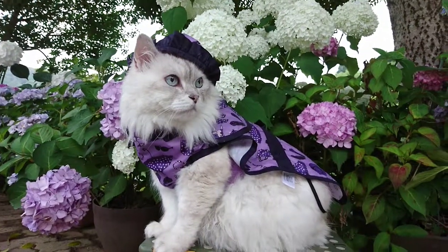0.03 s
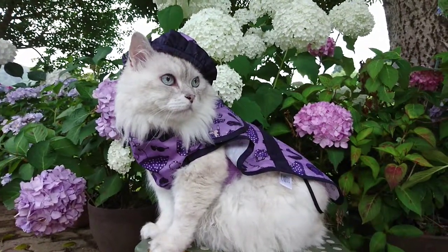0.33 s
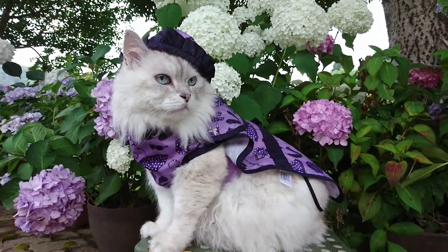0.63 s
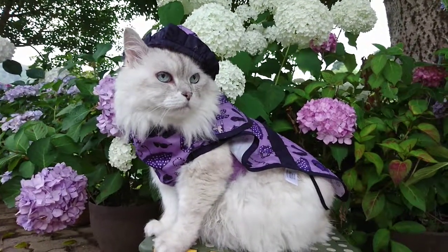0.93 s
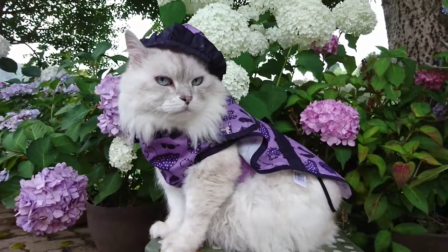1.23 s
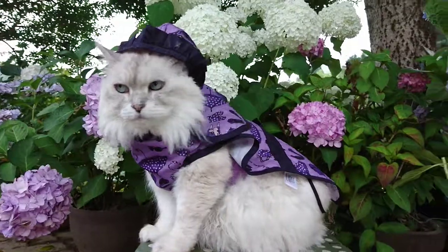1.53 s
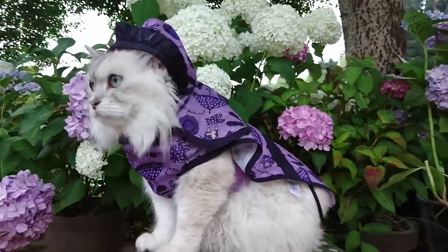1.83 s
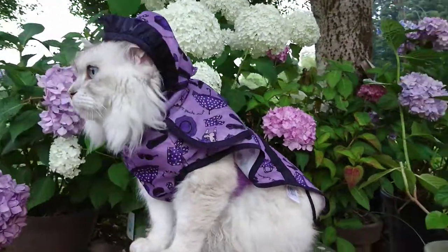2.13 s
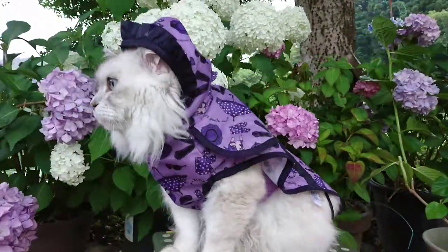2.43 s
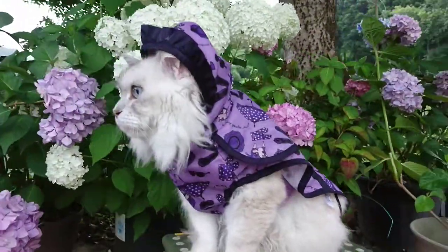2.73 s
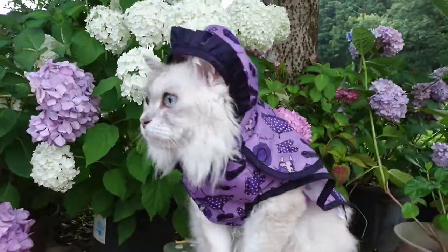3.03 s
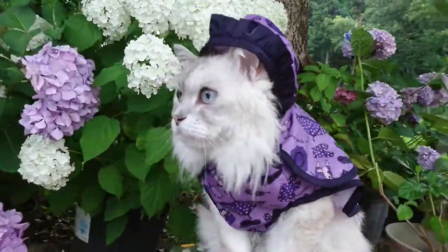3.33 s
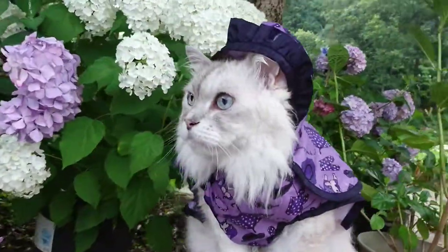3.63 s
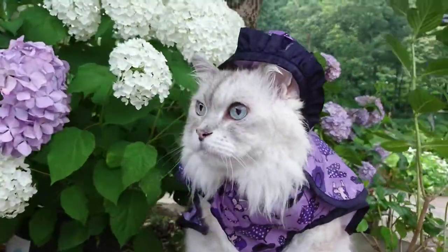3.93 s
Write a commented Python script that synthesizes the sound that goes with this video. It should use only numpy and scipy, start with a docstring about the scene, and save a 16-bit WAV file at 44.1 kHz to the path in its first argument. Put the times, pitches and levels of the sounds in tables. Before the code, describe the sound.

A brief whistled bird call outdoors, followed by soft rain and scattered water drips.

```python
"""Bush warbler in light rain

A bush warbler ends its song with three quick whistled notes that scatter among wet garden trees.
Fine rain hisses on the foliage and drips tick on leaves; one drop plops close by and one hits the
right microphone. Under it lie faint far chirps, a low outdoor rumble and a far drone, probably
traffic, that swells and fades."""
import sys
import numpy as np
from scipy import signal
from scipy.fft import rfft, irfft
from scipy.io import wavfile
from scipy.ndimage import uniform_filter1d

SR = 44100
rng = np.random.default_rng(int(sys.argv[2]) if len(sys.argv) > 2 else 0)


def materialize(psi):
    """Save the field psi as 16-bit PCM at rate SR to the path in sys.argv[1].

    A 1-D psi becomes a single channel; in a 2-D psi each row is a channel.
    """
    bounded = np.clip(np.atleast_2d(psi).T, -1, 1)
    quanta = np.round(bounded * 32767).astype(np.int16)
    wavfile.write(sys.argv[1], SR, quanta)


N = 176400
T = np.arange(N) / SR
BIN_HZ = np.maximum(np.arange(N // 2 + 1) * SR / N, 1)


def from_db(db):
    """Decibels to gain."""
    return 10 ** (np.asarray(db) / 20)


def unit_rms(x):
    """Scale to rms one."""
    return x / np.sqrt(np.mean(x ** 2) + 1e-20)


def pan(db):
    """Stereo gains, mean one; db is left minus right."""
    gains = from_db(np.array([[db], [-db]]) / 2)
    return gains / gains.mean()


def envelope(points):
    """Gain curve through (time_s, level_db) points."""
    return from_db(np.interp(T, *np.transpose(points)))


def low_cut(x, hz):
    """Second-order high-pass."""
    return signal.sosfilt(signal.butter(2, hz, "high", fs=SR, output="sos"), x)


def drift(rate_hz, size):
    """Smooth random wander, rms one."""
    hz = np.arange(size // 2 + 1) * SR / size
    return unit_rms(irfft(rfft(rng.standard_normal(size)) / (1 + (hz / rate_hz) ** 2), size))


def click(start_s):
    """Unit impulse."""
    return 1. * (np.arange(N) == int(start_s * SR))


def ring(x, hz, t60_s):
    """Resonator: a unit click starts a decaying sine of height one."""
    radius, angle = from_db(-60 / (t60_s * SR)), 2 * np.pi * hz / SR
    return signal.lfilter([0, np.sin(angle)], [1, -2 * radius * np.cos(angle), radius ** 2], x + 1e-18)


def radiate(x, hz, t60_s):
    """Mode of a small object, which gives off no bass."""
    return np.diff(ring(x, hz, t60_s), prepend=0) / (2 * np.sin(np.pi * hz / SR))


def colour(hz, db):
    """Gain per FFT bin, falling 12 dB per octave above the last point."""
    return from_db(np.interp(np.log(BIN_HZ), np.log(hz), db)) * np.minimum(hz[-1] / BIN_HZ, 1) ** 2


def band_noise(spectrum, correlation):
    """Coloured stereo noise with a given left-right correlation, rms one."""
    hz, db = np.transpose(spectrum)
    gain = colour(hz, db) * np.minimum(BIN_HZ / hz[0], 1) ** 2
    mid, side = irfft(rfft(rng.standard_normal((2, N))) * gain, N)
    return unit_rms(np.sqrt(1 + correlation) * mid + np.sqrt(1 - correlation) * side * [[1], [-1]])


def hiss(spectrum):
    """Independent noise on each side, each with its own colour."""
    hz, *sides_db = np.transpose(spectrum)
    return irfft(rfft(rng.standard_normal((2, N))) * [colour(hz, db) for db in sides_db], N)


def scatter(t60_s, build_s=.014):
    """Stereo response of countless small reflections that build and decay, unit energy."""
    t = T[:SR]
    response = rng.standard_normal((2, SR)) * from_db(-60 * t / t60_s) * (1 - np.exp(-t / build_s))
    return unit_rms(response) / np.sqrt(SR)


def whistle(note, t, edge_s=.004, waver=.004, overtone_db=-35):
    """Nearly pure tone gliding through (time_s, pitch_hz, level_db) points."""
    time_s, pitch_hz, level_db = np.transpose(note)
    glide_hz = uniform_filter1d(np.interp(t, time_s, pitch_hz), size=128)
    wavering_hz = glide_hz * (1 + waver * drift(rate_hz=165, size=len(t)))
    phase = 2 * np.pi * np.cumsum(wavering_hz) / SR
    tone = np.sqrt(2) * (np.sin(phase) + from_db(overtone_db) * np.sin(2 * phase))
    gate = np.clip(np.minimum(t - time_s[0], time_s[-1] - t) / edge_s + .5, 0, 1)
    return from_db(np.interp(t, time_s, level_db)) * np.sin(gate * np.pi / 2) ** 2 * tone


# Rumble, drone and swell spectra: freq_hz, relative_db
RUMBLE_SPECTRUM = [(20, -44), (35, -20), (55, -3), (115, 0), (170, -7), (250, -14), (500, -17), (900, -50)]
DRONE_SPECTRUM = [(240, -29.5), (305, -10), (350, 0.5), (395, -2.5), (460, -8), (600, -19.5), (900, -53)]
SWELL_SPECTRUM = [(200, -16.5), (270, -11.5), (325, -0.5), (365, -7.5), (430, -20), (600, -35)]
# Rumble and drone envelopes: time_s, level_db
RUMBLE_ENVELOPE = [(0, -73.5), (.45, -72), (.9, -68.5), (1.3, -70.5), (2.0, -71.5), (3.3, -73), (3.85, -67),
                   (4, -69)]
DRONE_ENVELOPE = [(0, -72.5), (.7, -81.5), (1.2, -75.5), (1.7, -80.5), (2.05, -69.5), (2.46, -73),
                  (3.1, -68), (3.65, -76.5), (4, -68.5)]


def rumble_and_drone(swell_db=-64, swell_peak_s=3.08, swell_width_s=.47):
    """Outdoor rumble, a far drone, probably traffic, and a lower drone that swells once."""
    rumble = envelope(RUMBLE_ENVELOPE) * band_noise(RUMBLE_SPECTRUM, correlation=.84)
    drone = envelope(DRONE_ENVELOPE) * band_noise(DRONE_SPECTRUM, correlation=.71)
    swell_gain = from_db(swell_db) * np.exp(-((T - swell_peak_s) / swell_width_s) ** 2)
    swell = swell_gain * band_noise(SWELL_SPECTRUM, correlation=.71)
    return pan(-5) * (rumble + drone + swell)


# Distant chirps: start_s, length_s, start_hz, end_hz, level_db
CHIRPS = [(.98, 0.093, 4315, 4450, -71), (1.103, .08, 4280, 4080, -72), (3.572, .05, 3720, 3880, -67)]


def far_birds():
    """Chirps so far off that only their scatter arrives."""
    chirps = sum(whistle([(start_s, start_hz, db), (start_s + length_s, end_hz, db)], T)
                 for start_s, length_s, start_hz, end_hz, db in CHIRPS)
    return signal.fftconvolve(chirps[None], scatter(t60_s=.45), axes=1)[:, :N]


# Rain spectra before and after the microphone turns: freq_hz, left_db, right_db
RAIN_BEFORE_TURN = [(610, -61.5, -58.5), (900, -60.5, -58), (1330, -59.5, -60), (1900, -53, -55.5),
                    (2430, -51.5, -54.5), (3180, -59.5, -55.5), (4060, -62, -53.9), (5310, -63, -56),
                    (6300, -67.5, -53.4), (7260, -64, -55), (7960, -75, -70), (8500, -94.5, -69)]
RAIN_AFTER_TURN = [(590, -56.5, -55.5), (940, -59.5, -56), (1280, -58.5, -57), (1910, -55.5, -54),
                   (2470, -57.5, -50.5), (3240, -62, -53), (4180, -59.2, -56.5), (5240, -62.8, -57.5),
                   (6360, -65.5, -63), (7340, -59.5, -55.5), (8080, -77, -60), (8860, -76, -62)]
# Rain envelope: time_s, gain_db
RAIN_ENVELOPE = [(0, -.5), (1.0, -.5), (1.5, -.3), (1.95, 1), (2.3, -0.5), (2.8, 0.1), (3.1, 1.5), (3.5, 0),
                 (3.75, 0.5), (4, 0)]


def rain(gain_db=-.5, turn_start_s=2.1, turn_end_s=2.71):
    """Far droplets on foliage merge into a hiss whose colour shifts as the microphone turns."""
    turned = np.clip((T - turn_start_s) / (turn_end_s - turn_start_s), 0, 1)
    blend = np.sqrt(1 - turned) * hiss(RAIN_BEFORE_TURN) + np.sqrt(turned) * hiss(RAIN_AFTER_TURN)
    return from_db(gain_db) * envelope(RAIN_ENVELOPE) * low_cut(blend, hz=450)


def patter(drops_per_s=180, level_db=-73, spread_db=3.5, t60_cycles=4.1):
    """Nearer droplets tick at random on leaves of many sizes."""
    leaf_hz = np.geomspace(1500, 7500, 12)
    lands = rng.random((2, N)) < drops_per_s / SR / 2
    sizes = from_db(spread_db * np.minimum(rng.exponential(1, (2, N)), 4))
    hits = lands * sizes * rng.choice([-1, 1], (2, N))
    leaf = rng.integers(0, len(leaf_hz), (2, N))
    ticks = sum(radiate(hits * (leaf == k), hz, t60_cycles / hz) for k, hz in enumerate(leaf_hz))
    return from_db(level_db) * pan(-6.5) * unit_rms(ticks)


# Drips on leaves: start_s, level_db, pitch_hz, t60_s, splash_relative_db, pan_db
LEAF_DRIPS = [(1.2248, -38.5, 6540, 0.0014, -11, -12), (1.9496, -42, 6700, 0.0035, -26, -16),
              (2.0733, -33.5, 3500, 0.003, -3, -14), (2.4068, -41, 7000, .002, -3, -11),
              (2.9851, -39.5, 6850, .002, -13, -23), (3.091, -38.5, 2650, 0.0069, -4, -20),
              (3.2927, -41, 2700, .002, -2, -6), (3.7463, -49, 1320, 0.0095, -5, -9),
              (3.7788, -46, 6500, 0.0016, -5, -15)]


def drips(splash_hz=5750, splash_t60_s=.0022):
    """Each drip rings a leaf briefly and adds a bright splash."""
    mix = np.zeros((2, N))
    for start_s, level_db, pitch_hz, t60_s, splash_db, pan_db in LEAF_DRIPS:
        hit = click(start_s)
        tick = radiate(hit, pitch_hz, t60_s)
        splash = from_db(splash_db) * radiate(hit, splash_hz, splash_t60_s)
        mix += from_db(level_db) * pan(pan_db) * (tick + splash)
    return mix


# Hollow body modes: freq_hz, relative_db, t60_s
HOLLOW_MODES = [(615, -1, 0.0074), (970, -2.5, 0.0076), (1600, -1, 0.0063), (1830, -3.5, 0.0076),
                (2200, -7, 0.01), (3650, -14.5, .005), (4670, -14.5, 0.0031), (7450, -18.5, 0.0085)]


def plop(start_s=2.5722, gain_db=-23, low_cut_hz=315):
    """A fat drop knocks a damped hollow body; adjacent modes swing in opposite directions."""
    body = sum((-1) ** k * from_db(db) * ring(click(start_s), hz, t60_s)
               for k, (hz, db, t60_s) in enumerate(HOLLOW_MODES))
    return from_db(gain_db) * pan(-5) * low_cut(low_cut(body, low_cut_hz), low_cut_hz)


# Microphone port and housing modes: freq_hz, level_db, t60_s
PORT_MODES = [(5540, -12.5, 0.0013), (14500, -4.5, 0.00076)]
HOUSING_MODES = [(70, -38, 0.1), (150, -41, 0.037), (358, -29.5, 0.023)]


def drop_on_microphone(start_s=1.9236, pulse_db=-5.5, width_s=.00009, left_leak_db=-36):
    """A drop hits the right microphone: two-sided pressure pulse, port crack, housing thump."""
    hit = click(start_s)
    pulse_time = (T - start_s) / width_s
    pulse = from_db(pulse_db) * pulse_time * np.exp((1 - pulse_time ** 2) / 2)
    crack = sum(from_db(db) * ring(hit, hz, t60_s) for hz, db, t60_s in PORT_MODES)
    thump = sum(from_db(db) * radiate(hit, hz, t60_s) for hz, db, t60_s in HOUSING_MODES)
    return (pulse + crack + low_cut(thump, hz=23)) * from_db([[left_leak_db], [0]])


# Near reflections: delay_s, gain_db, pan_db
REFLECTIONS = [(.0027, -11, -3), (.0118, -16.5, -13), (.031, -20.5, -2.5)]


def through_trees(song, left_lag_s=.00006):
    """Direct sound from the right, near reflections, dense scatter from near and far trees."""
    n = np.arange(len(song))
    direct = pan(-3) * np.array([np.interp(n - left_lag_s * SR, n, song), song])
    reflected = sum(from_db(gain_db) * pan(pan_db) * np.interp(n - delay_s * SR, n, song)
                    for delay_s, gain_db, pan_db in REFLECTIONS)
    near_trees = from_db(-10.5) * scatter(t60_s=.42)
    far_trees = from_db(-18) * scatter(t60_s=1.19)
    scattered = signal.fftconvolve(song[None], near_trees + far_trees, axes=1)[:, :len(song)]
    return direct + reflected + pan(-2) * scattered


# Warbler note contours: time_s, pitch_hz, relative_db
LOW_WHISTLE = [(-.085, 2935, -28), (-.06, 2560, -28), (-.04, 2450, -20), (-.026, 2200, -24.5),
               (-.018, 1615, -41.5), (-.008, 2053, -34.5), (.003, 2026, -25.5), (.009, 2090, -37)]
HIGH_WHISTLE = [(.038, 3650, -47), (0.045, 4180, -32), (0.048, 3690, -28.5), (0.057, 3664, -27),
                (0.061, 3655, -25.5), (.070, 4210, -26.5), (.076, 4360, -32), (.083, 4330, -49)]
FALLING_WHISTLE = [(0.121, 3013, -47), (.127, 2995, -27.5), (0.141, 2936, -22), (0.145, 3128, -27.5),
                   (0.153, 3060, -21.5), (.158, 2724, -24.5), (0.167, 2143, -24.5), (.174, 1883, -24),
                   (0.18, 1550, -37), (0.19, 1438, -39.5), (0.196, 1450, -55)]


def warbler(gain_db=-2, lead_s=.2):
    """Three whistled notes among the trees; the first is already sounding at time zero."""
    lead = int(lead_s * SR)
    t = np.arange(-lead, N) / SR
    song = sum(whistle(note, t) for note in (LOW_WHISTLE, HIGH_WHISTLE, FALLING_WHISTLE))
    return from_db(gain_db) * through_trees(song)[:, lead:]


def scene():
    """The garden in light rain."""
    birds = warbler() + far_birds()
    water = drips() + plop() + drop_on_microphone() + rain() + patter()
    return birds + water + rumble_and_drone()


def record(dry, edge_hz=8160, leak_db=-26.5, cutoff_hz=15700):
    """Passes little above the treble edge and cuts the very top steeply."""
    dull = signal.sosfiltfilt(signal.butter(12, edge_hz, fs=SR, output="sos"), dry)
    top_cut = signal.butter(16, cutoff_hz, fs=SR, output="sos")
    return signal.sosfilt(top_cut, dull + from_db(leak_db) * dry)


dry = scene()
out = record(dry)
materialize(out)
```